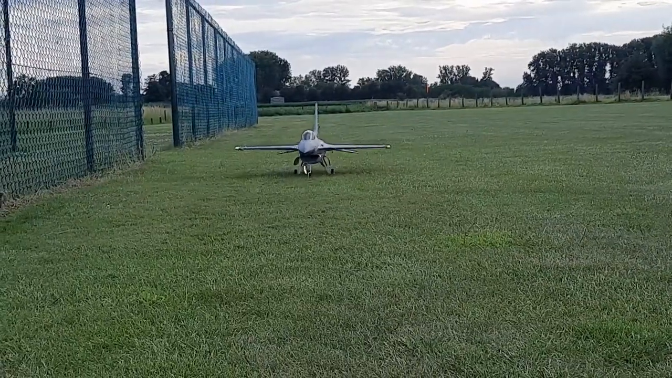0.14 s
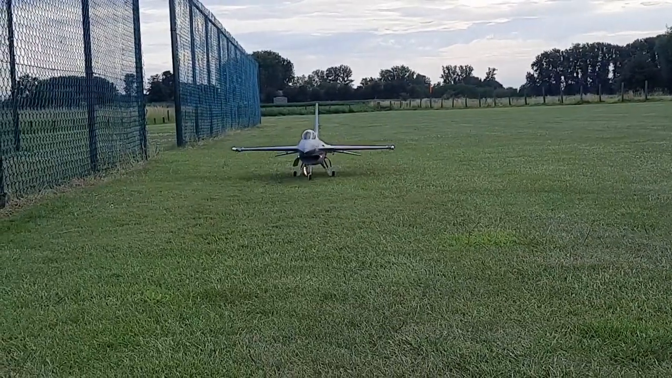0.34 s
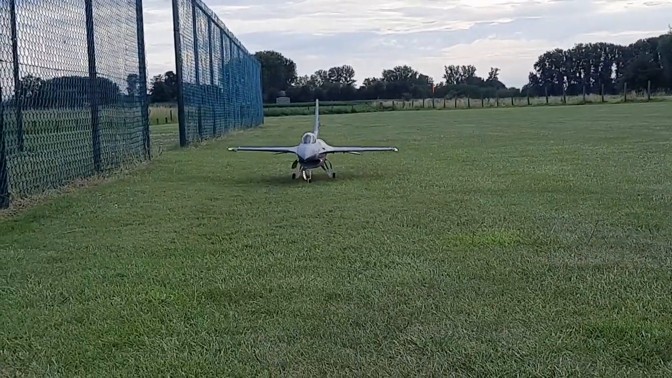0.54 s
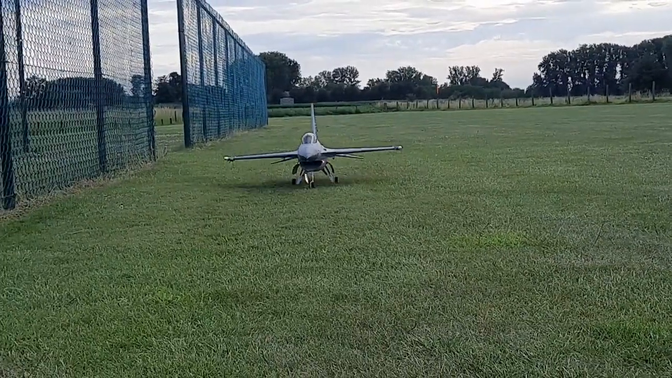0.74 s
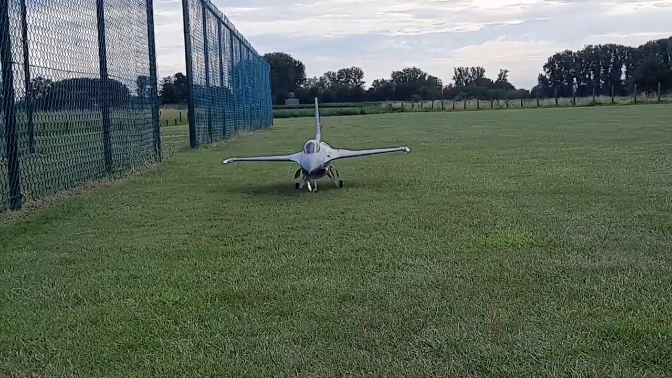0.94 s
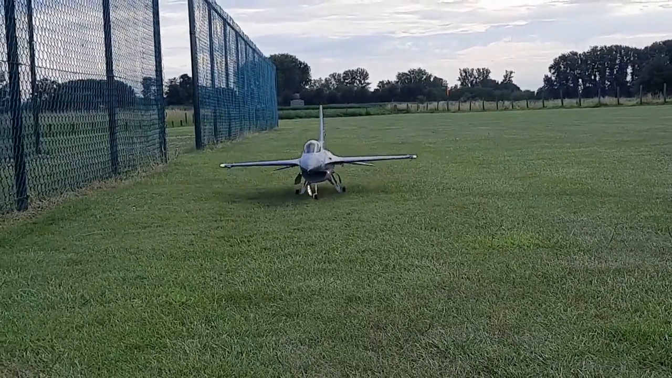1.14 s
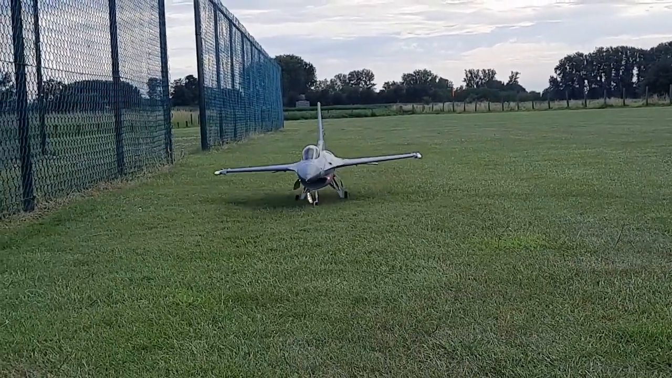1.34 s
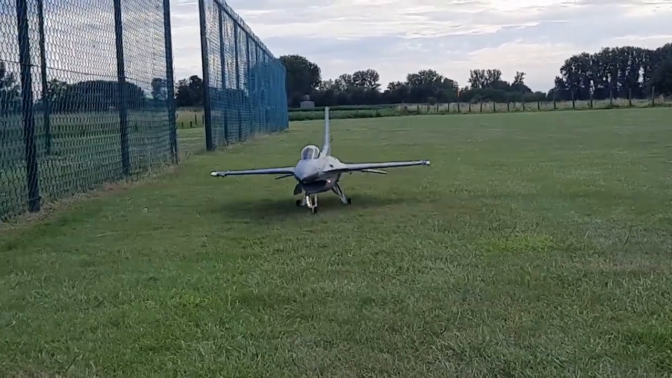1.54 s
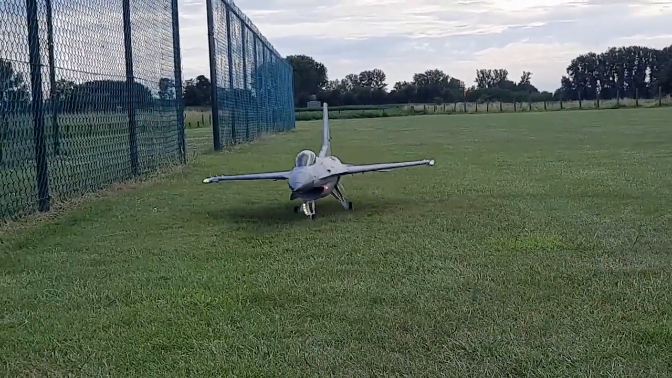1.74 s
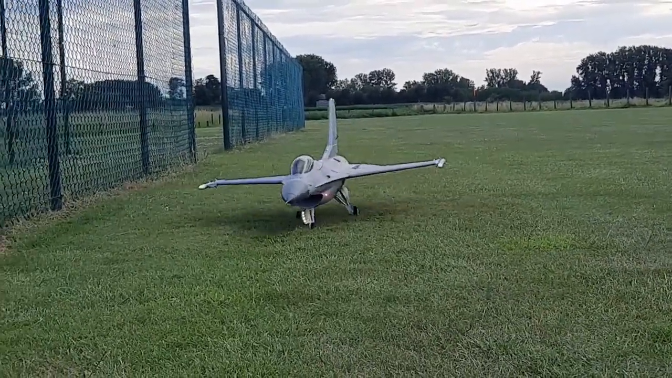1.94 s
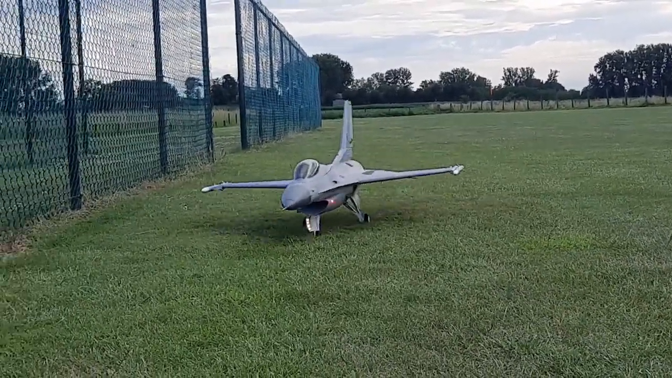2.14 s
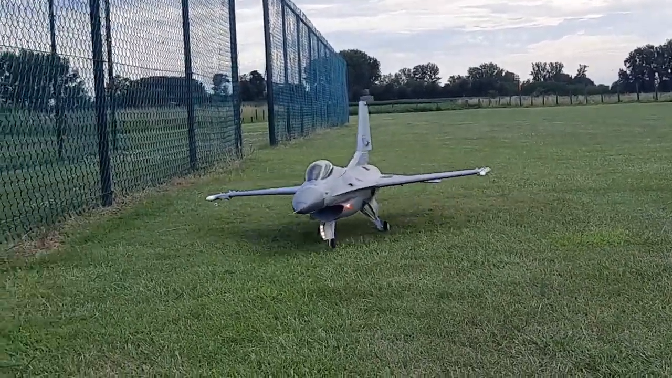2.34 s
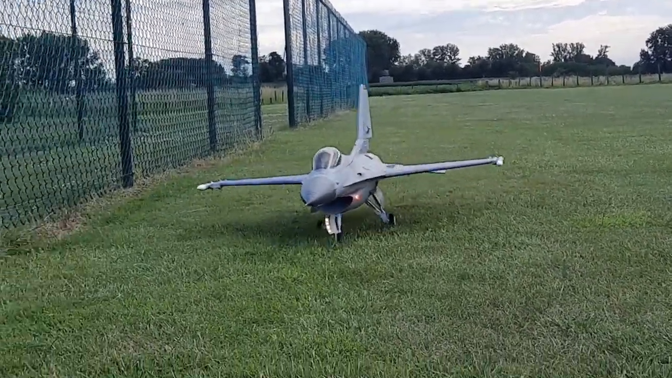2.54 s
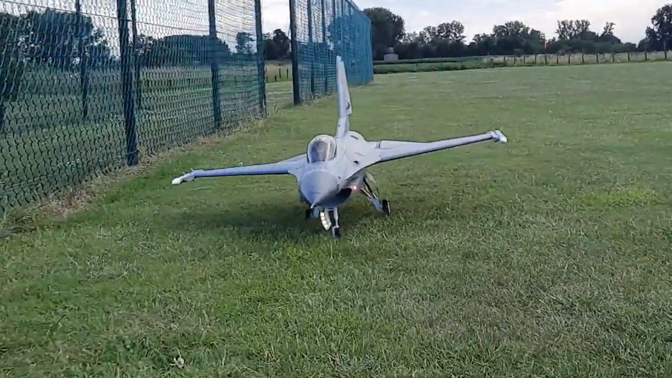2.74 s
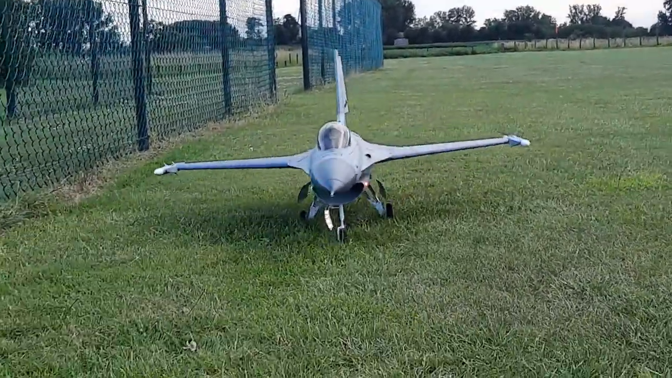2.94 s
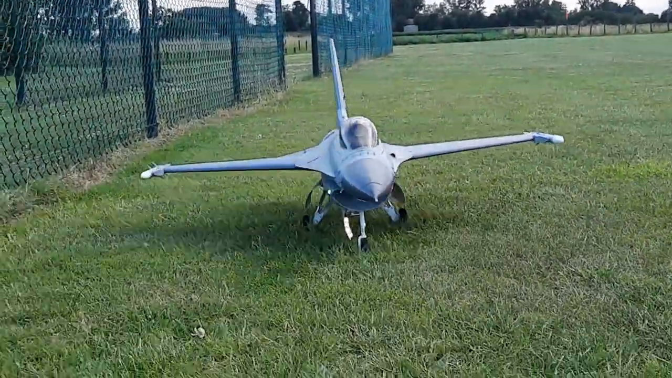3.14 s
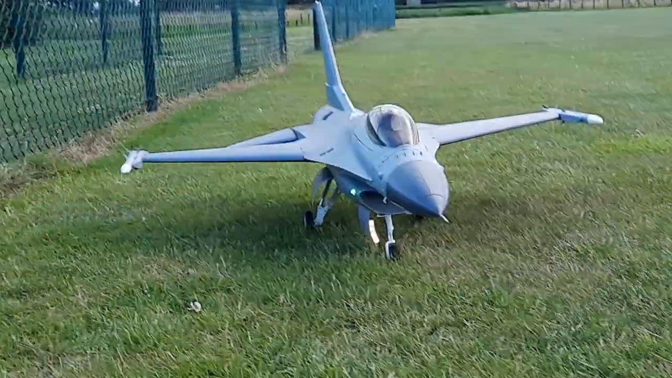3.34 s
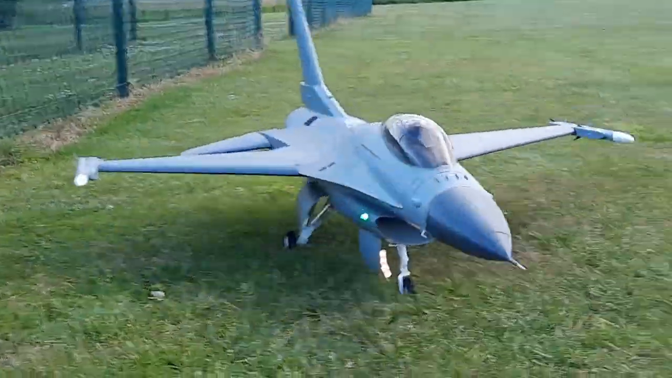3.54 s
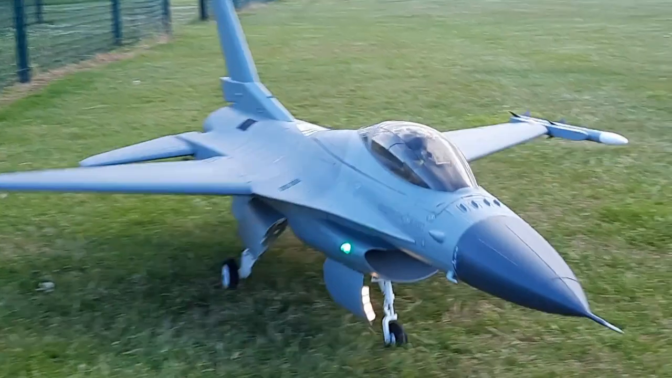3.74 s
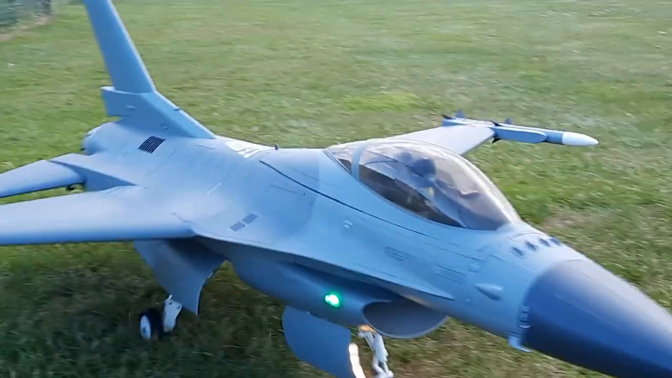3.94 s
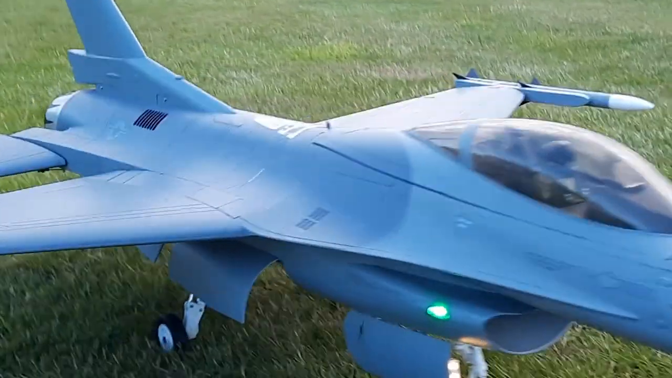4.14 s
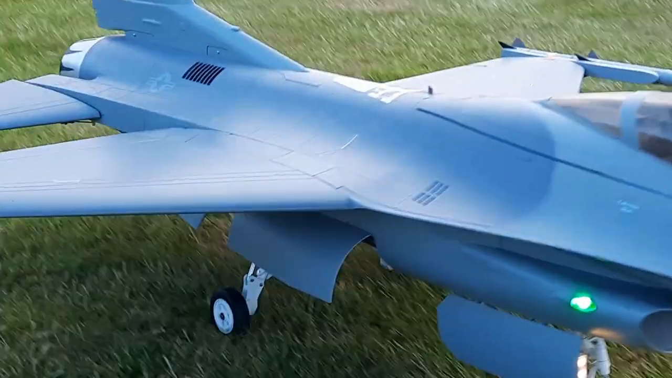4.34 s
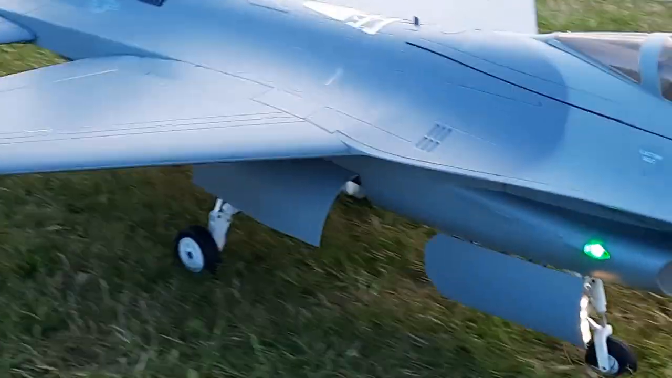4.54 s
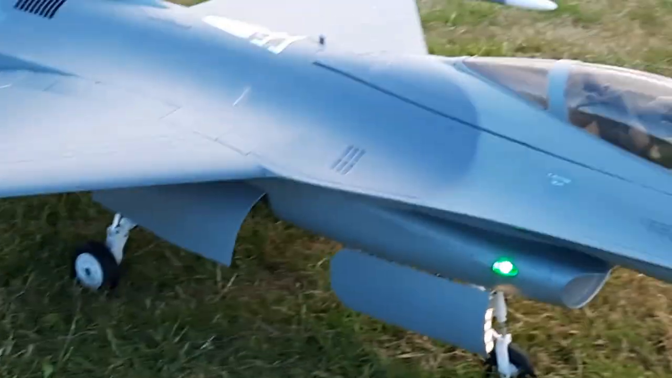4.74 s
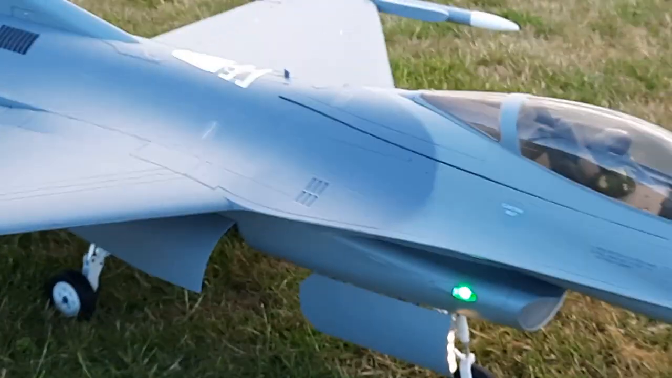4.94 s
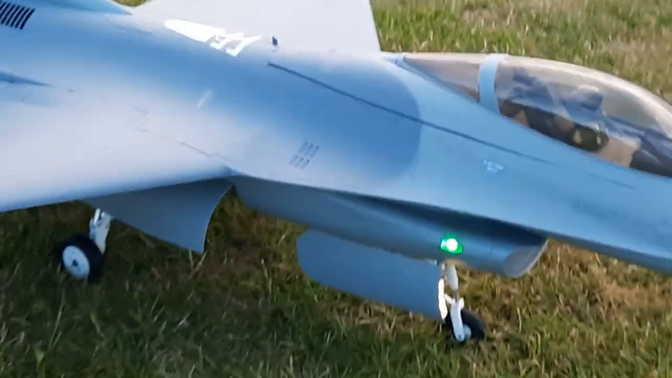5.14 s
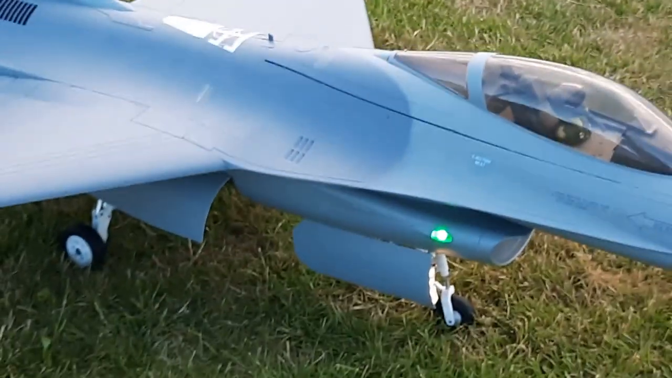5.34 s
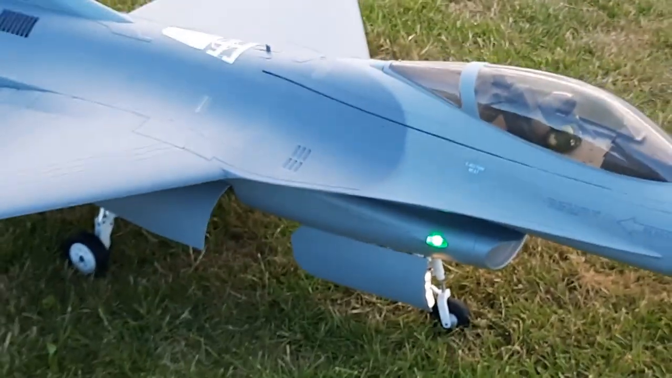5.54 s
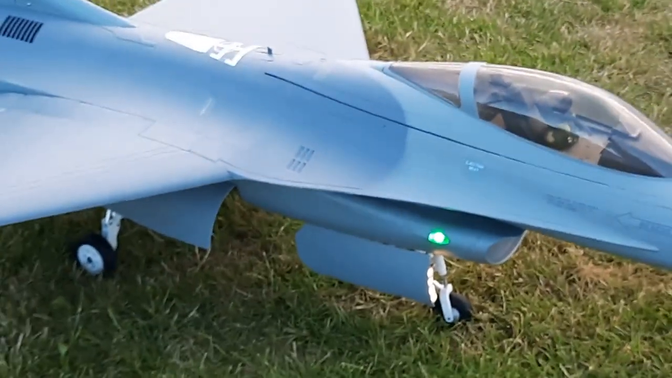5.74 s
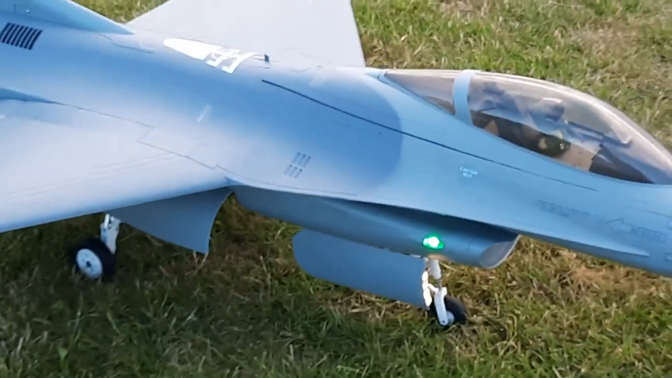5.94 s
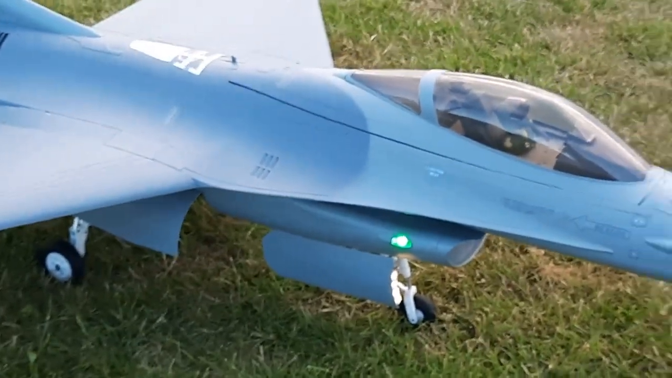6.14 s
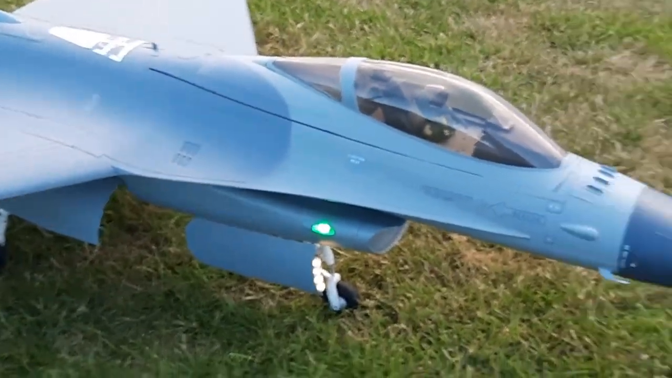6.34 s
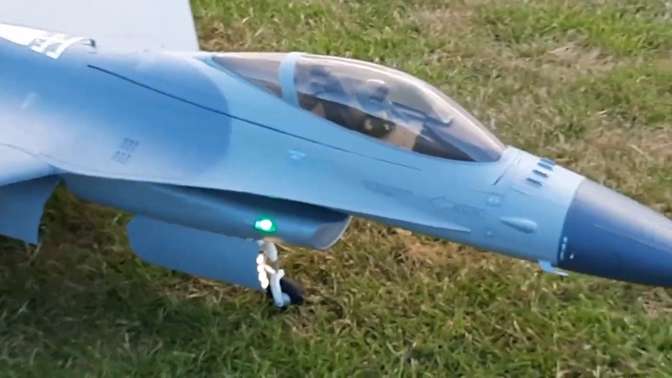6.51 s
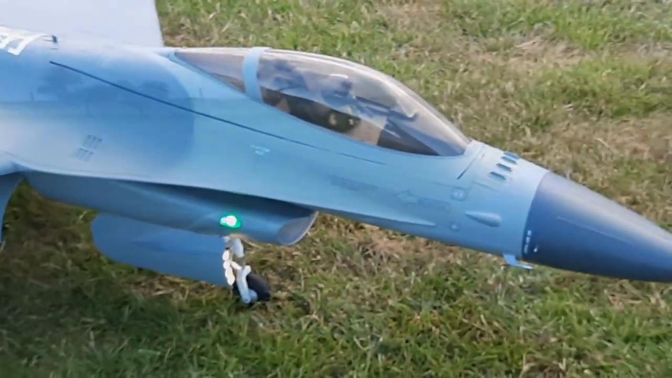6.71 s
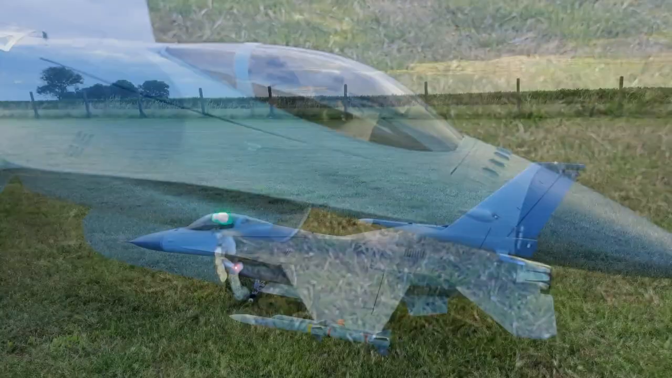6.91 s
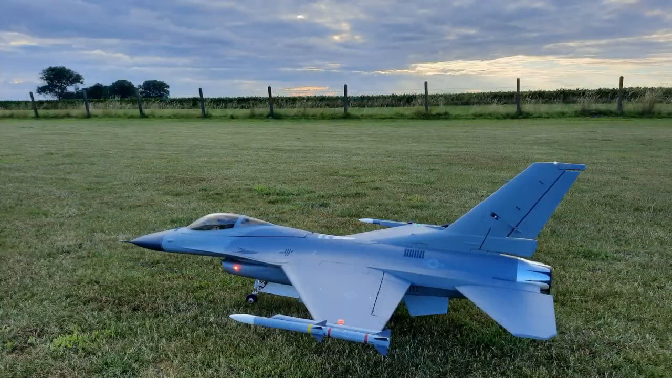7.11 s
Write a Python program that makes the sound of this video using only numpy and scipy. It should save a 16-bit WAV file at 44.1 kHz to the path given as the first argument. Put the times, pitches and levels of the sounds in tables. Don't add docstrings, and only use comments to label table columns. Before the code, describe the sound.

A piercing, slightly beating fan tone and airy duct rush grow gradually nearer over grass. After almost four seconds the pitch plunges, with uneven hollow knocks, bumps and bright rustling very close to the handheld stereo microphone. Then near silence in an open field: faint airy whirring and wavering high squeaks, a quick cluster of gritty servo buzzes, tiny dull ticks, and finally a faint faraway hiss.

```python
import sys
import numpy as np
from scipy import signal
from scipy.fft import rfft, irfft
from scipy.io import wavfile
from scipy.ndimage import uniform_filter1d, map_coordinates

SR = 44100
rng = np.random.default_rng(int(sys.argv[2]) if len(sys.argv) > 2 else 0)


def put_to_file(sound):
    columns = np.atleast_2d(sound).T
    safe = np.clip(columns, -1, 1)
    whole_steps = np.round(safe * 32767)
    wavfile.write(sys.argv[1], SR, whole_steps.astype(np.int16))


def volts_from_db(level):
    exponent = np.asarray(level, float) / 20
    return 10 ** exponent


N = 316192

HOP = 128
FRAME_S = np.arange(N // HOP + 2) * HOP / SR
BIN_HZ = np.maximum(np.arange(2 * HOP + 1) * SR / (4 * HOP), 20)[:, None]
FULL_HZ, CUT_S = 4418, 3.7

# (time [s], left port leads [ms], share of direct sound [0-1])
PATH = [(0, 0.022, 0.99), (2.5, 0.0042, 0.96), (3.2, 0.0028, 1), (3.8, 0.051, 0.99), (4.4, 0.11, 0.6),
        (5.0, 0.17, 0.71), (7.2, 0.18, 0.56)]
# (pitch [Hz], width [Hz], lift [dB])
DUCT = [(364.6, 860, -6), (474, 140, 5.5), (662, 100, 5), (990, 260, 5), (1500, 190, 8), (1843, 95, 4.5),
        (2390, 410, 3), (2920, 260, 3), (3370, 270, 3), (5600, 100, 4), (6590, 120, 4), (7600, 160, 0),
        (2104, 61, -4.5), (800, 44, -3.5), (585, 50, -3), (5860, 200, -2.5), (3800, 250, 0.5)]
# (time [s], hump [dB])
INFLOW = [(0, 3), (1.9, 4), (2.05, 7), (2.35, 8), (2.45, 4.5), (3.25, 5.5), (3.45, 11), (3.7, 14), (3.8, 8),
          (3.95, 4), (4.7, 4)]


def in_time(rows, at_s, silent_db=-120):
    s, *columns = np.transpose(rows)
    return [np.interp(at_s, s, c, silent_db, silent_db) for c in columns]


def at_hz(points, hz):
    return np.interp(np.log(hz), np.log(np.array(points)[:, 0]), np.array(points)[:, 1])


def colour_db(spectrum, modes, hz):
    bells = sum(db / (1 + (2 * (hz - top) / wide) ** 2) for top, wide, db in modes)
    return at_hz(spectrum, hz) + bells


def band_db(spectrum, modes, low_hz, high_hz):
    hz = np.arange(low_hz, high_hz)
    return 10 * np.log10(np.sum(volts_from_db(2 * colour_db(spectrum, modes, hz))) * 2 / SR)


def drift(rate, count):
    r = np.exp(-2 * np.pi * rate * HOP / SR)
    chance = rng.standard_normal((count, len(FRAME_S) + 600))
    slow = signal.lfilter([1], [1, -2 * r, r * r], chance)[:, 600:]
    return slow / slow.std(axis=1, keepdims=True)


def flicker(shared_db, own_db, rate):
    place = np.log2(BIN_HZ[:, 0] / 20) * 3
    own, below = drift(rate, count=33), place.astype(int)
    share = (place - below)[:, None]
    by_pitch = (1 - share) * own[below] + share * own[below + 1]
    return shared_db * drift(rate, count=1) + own_db * by_pitch


def swells(rows, rise, fall):
    levels = []
    for s, long_s, db in rows:
        before = np.maximum(s - FRAME_S, 0)
        after = np.maximum(FRAME_S - s - long_s, 0)
        levels.append(db - rise * before - fall * after)
    return np.max(levels, axis=0)


def grit(per_s, spread_db):
    sizes = volts_from_db(spread_db * np.minimum(rng.exponential(1, (2, N)), 4)) * rng.choice([-1, 1], (2, N))
    clicks = sizes * (rng.random((2, N)) < per_s / SR)
    return clicks / clicks.std()


def ring(clicks, hz, t60):
    r, w = volts_from_db(-60 / (t60 * SR)), 2 * np.pi * hz / SR
    return signal.lfilter([0, np.sin(w)], [1, -2 * r * np.cos(w), r * r], clicks)


def two_ports(near, other, spectrum, modes, gain_db, direct=1.0):
    # (pitch [Hz], likeness [0-1])
    likeness = [(30, 0.75), (100, 0.97), (1400, 0.99), (2500, 0.88), (3500, 0.93), (5500, 0.61), (7000, 1),
                (9000, 0.75), (10500, 0.33), (15000, .5)]
    hz = np.maximum(np.fft.rfftfreq(N, 1 / SR), 10)
    tinted = irfft(rfft([near, other]) * volts_from_db(colour_db(spectrum, modes, hz)), N)
    frames = signal.stft(tinted, nperseg=4 * HOP, noverlap=3 * HOP)[2]
    count = frames.shape[2]
    near, other = frames * volts_from_db(gain_db[:, :count])
    lead_ms, share = [c[:count] for c in in_time(PATH, FRAME_S)]
    alike = np.clip(at_hz(likeness, BIN_HZ) * direct * share ** (BIN_HZ / 2000), 0, 1)
    delayed = near * np.exp(-2j * np.pi * BIN_HZ * lead_ms / 1000)
    right = alike * delayed + np.sqrt(1 - alike ** 2) * other
    return signal.istft(np.array([near, right]), nperseg=4 * HOP, noverlap=3 * HOP)[1][:, :N]


def placed(x, lag=0.88):
    lead_ms = in_time(PATH, np.arange(N) / SR)[0]
    heard_at = np.arange(N) - lag * lead_ms * SR / 1000
    return np.array([x, map_coordinates(x, [heard_at], order=3)])


def speed_at(t):
    # (time [s], blade rate [Hz])
    speed = [(0.0, 4262), (0.1, 4151), (2.36, 4163), (2.5, 4312), (2.73, 4405), (2.8, 4477), (3.68, 4465),
             (3.75, 4365), (3.87, 3825), (3.94, 3346), (4.06, 2238), (4.19, 1574), (4.3, 1204), (4.54, 737),
             (4.76, 482), (4.98, 296), (5.1, 207), (5.28, 108)]
    s, rate = np.transpose(speed)
    hz = np.exp(np.interp(t, s, np.log(rate)))
    return hz, 20 * np.log10(hz / FULL_HZ)


def near_at(t):
    # (time [s], gain [dB])
    nearness = [(0.0, -9), (0.03, -9), (1.0, -6.5), (1.96, -4.5), (2.15, -3.5), (2.46, -3.5), (3.0, -2.5),
                (3.5, -1.5), (3.7, -1.3), (3.86, 0.5), (4.2, 5), (4.7, 2)]
    return np.interp(t, *np.transpose(nearness))


def shaft_hum():
    t = np.arange(N) / SR
    rate_hz, slow_db = speed_at(t)
    turn = 2 * np.pi * np.cumsum(rate_hz / 12) / SR
    sway_db = 2.5 * np.interp(t, FRAME_S, drift(3.0, count=1)[0])
    level_db = -37.5 + 0.82 * near_at(t) + 40 * slow_db * (t > CUT_S) + sway_db
    return placed(volts_from_db(level_db) * np.sin(turn))


def blade_tones():
    # (level [dB], share of nearness, share of the beat)
    driven_tones = [
        (-33, 1.1, 1.0),
        (-47, .6, .8),
        (-56, .4, .55),
    ]
    # (level [dB], power of speed, share of own rings, share of blade rate's path)
    coasting_tones = [
        (-34, 1.1, 1.0, 0.0),
        (-98.5, -1.0, 1.4, .5),
        (-49, 1.3, 1.8, .4),
    ]
    # (pitch [Hz], level [dB])
    shell = [(100, -3), (200, -2), (260, 13.5), (450, 16.5), (850, -0.5), (1300, -3), (2200, -2),
             (3400, 8.5), (4100, 9.5), (4400, 4.5)]
    # (pitch [Hz], width [Hz], lift [dB])
    shell_rings = [(290, 50, 15), (470, 60, -3.5), (553, 88, 11), (830, 55, 10.5), (1004, 140, 9.5),
                   (1480, 120, 6), (2800, 180, 3), (4407, 59, 6), (13440, 500, 9.5)]
    # (pitch [Hz], width [Hz], lift [dB])
    shell_dips = [(250, 24, -7), (370, 33, -15), (538, 14, -20), (770, 64, -6), (927, 60, -22),
                  (1000, 80, -18), (1170, 72, 3), (1290, 80, -12), (1850, 300, -8), (2350, 150, -8),
                  (3450, 120, -6)]
    # (pitch [Hz], width [Hz], lift [dB])
    octave_rings = [(1650, 73, 35), (5700, 900, 42.5)]
    flat = [(20, 0), (SR, 0)]
    fade_s = 0.029

    t = np.arange(N) / SR
    rate_hz, slow_db = speed_at(FRAME_S)
    wobble = drift(11.0, count=4)
    unsteady = np.where(t < CUT_S, .00015, .006) * np.interp(t, FRAME_S, wobble[3])
    turn = 2 * np.pi * np.cumsum(speed_at(t)[0] * (1 + unsteady)) / SR
    steady = np.clip(rate_hz / 4000, .25, 1)
    driven = np.clip((CUT_S + fade_s - FRAME_S) / fade_s, 0, 1)

    echo = np.clip(.24 + .13 * FRAME_S, .1, .9) * np.clip((2.3 - FRAME_S) / 0.25, .25, 1)
    echo = echo * np.exp(2j * np.pi * (FRAME_S - 0.78) / 0.3367)
    beat_db = 20 * np.log10(np.abs(1 + echo))
    smear_db = 2.0 * np.maximum(in_time(INFLOW, FRAME_S)[0] - 5.0, 0)
    gusts = np.clip(drift(40.0, count=1)[0], -2, .8) - .5
    flutter_db = 5.0 * np.clip(rate_hz / 1500 - .45, 0, 1) * gusts
    path_db = colour_db(shell, shell_rings + shell_dips, rate_hz)
    stop_db = -400 * np.maximum(FRAME_S - 5.215, 0)

    out = 0
    for k in range(3):
        on_db, near, beat = driven_tones[k]
        off_db, power, own, share = coasting_tones[k]
        ring_db = colour_db(flat, shell_rings, (k + 1) * rate_hz)
        smear = .3 if k == 1 else 1
        on = on_db + near * near_at(FRAME_S) + beat * beat_db - smear_db * smear + ring_db
        off = off_db + power * slow_db
        if k == 0:
            off = off + path_db
        else:
            off = off + own * ring_db * (rate_hz < 2000) + share * path_db
        if k == 1:
            off = off + colour_db(flat, octave_rings, 2 * rate_hz)
        if k == 2:
            off = off - 9.0 * (rate_hz > 2000)
        db = driven * on + (1 - driven) * (off + flutter_db)
        db = db + 1.1 * steady * (1 + k) * wobble[k] + stop_db
        out = out + np.interp(t, FRAME_S, volts_from_db(db + 4.0)) * np.sin((k + 1) * turn)
    return placed(out)


def fan_air():
    # (pitch [Hz], level [dB per Hz])
    fan = [(41, -42.5), (70, -19.5), (228, -12.5), (342, -0.5), (590, -11.5), (1040, -9), (1300, -21.5),
           (1530, -17), (1750, -20), (4050, -11), (5830, -14), (8000, -12.5), (9170, -24.5), (12900, -22),
           (15800, -33)]
    airflow_hz = [500, 1800, 5500, 12000]
    # (level close by [dB], share of nearness, gain when turned [dB], power of speed)
    air_laws = [
        (-27, 1.06, 0.6, 1.9),
        (-37.5, 1.654, 4, 4.86),
        (-24, 1.13, -2, 3),
        (-44, 0.42, 7.5, 3),
    ]
    # (time [s], share turned [0-1])
    turned_path = [(0.0, 0.43), (1.0, 0.36), (2.5, 0.51), (3.05, 0.78), (3.6, .95), (4.3, 0.63)]
    # (start [s], length [s], pitch [Hz], width [Hz], lift [dB])
    band_lifts = [(2.25, .27, 5520, 150, 7), (2.3, .55, 6350, 450, 4), (4.05, 0.2, 1500, 200, 8),
                  (3.7, .27, 2680, 250, 9), (3.68, 0.14, 2400, 1000, -5.5), (3.92, .1, 6300, 460, 8),
                  (3.96, 0.11, 4700, 350, 10), (4.4, 0.12, 5700, 400, 4), (4.8, 0.15, 5500, 200, 8),
                  (2.6, .9, 7900, 1600, -4), (3.7, .3, 13400, 2000, 6), (2.75, 1.5, 70, 160, 5),
                  (3.95, .15, 5600, 300, 6), (3.6, .35, 520, 200, 3), (2.62, .2, 3300, 1400, -3),
                  (4.0, .3, 13000, 4000, 3), (3.35, .35, 5000, 400, 3)]
    edges = [(60, 1200), (1300, 2400), (4800, 8200), (9500, 15500)]
    rate_hz, slow_db = speed_at(FRAME_S)
    turned = np.interp(FRAME_S, *np.transpose(turned_path))

    gain_db = 0
    for (db, near, turn_db, power), band, one in zip(air_laws, edges, np.eye(4)):
        level_db = db + near * near_at(FRAME_S) + turn_db * turned + power * slow_db
        weight = np.interp(np.log(BIN_HZ), np.log(airflow_hz), one)
        gain_db = gain_db + weight * (level_db - band_db(fan, DUCT, *band))

    hump_db = np.maximum(in_time(INFLOW, FRAME_S)[0], 0)
    third_share = .45 * np.minimum(rate_hz / FULL_HZ, 1) ** 24
    for order, share, wide in [(1, 0.58, 0.036), (3, third_share, 0.02)]:
        away = np.log(BIN_HZ / (order * 1.016 * rate_hz)) / (wide * (1 + 1.6 * turned))
        gain_db = gain_db + share * hump_db * np.exp(-away ** 2)

    for s, long_s, hz, wide, db in band_lifts:
        present = np.clip(np.minimum(FRAME_S - s, s + long_s - FRAME_S) / .04, 0, 1)
        gain_db = gain_db + db * present / (1 + (2 * (BIN_HZ - hz) / wide) ** 2)

    bumpy = 1 + 1.1 / (1 + (BIN_HZ / 1200) ** 2)
    gain_db = gain_db + bumpy * flicker(0.24, 0.34, 21.0) + flicker(0.2, 0.39, 0.41)
    return two_ports(*rng.standard_normal((2, N)), fan, DUCT, gain_db)


def quiet_field():
    # (pitch [Hz], level [dB per Hz])
    field = [(18, -30), (30, -12), (134, -5.5), (209, -16.5), (318, -10), (483, -16.5), (716, -21),
             (1380, -27.5), (2100, -16.5), (2520, -20.5), (3360, -37), (5830, -29.5), (9350, -41.5),
             (13500, -34), (15800, -40)]
    # (time [s], half length [s], pitch [Hz], lift [dB])
    stirs = [
        (5.953, 0.05, 450, 11.5),
        (6.593, 0.035, 521, 10.5),
    ]
    gain_db = -70.5 - band_db(field, [], 30, 15800) + flicker(.5, 1.0, 1.9)
    for s, wide_s, hz, db in stirs:
        gain_db = gain_db + db * np.exp(-((FRAME_S - s) / wide_s) ** 2 - np.log2(BIN_HZ / hz) ** 2)
    return two_ports(*rng.standard_normal((2, N)), field, [], gain_db, direct=0.23)


def rolling():
    # (pitch [Hz], level [dB per Hz])
    airframe = [(20, -51), (50, -26.5), (140, -9), (240, -11.5), (420, -11), (1000, -22.5), (1700, -24.5),
                (2050, -25), (2750, -18), (3600, -26), (6100, -26.5), (6700, -29), (9000, -38),
                (15800, -44.5)]
    # (time [s], level [dB])
    bumps = [(4.022, -43), (4.12, -52), (4.27, -45.5), (4.426, -49), (4.594, -46.5), (4.734, -50),
             (4.87, -54.5), (5.03, -53)]
    # (start [s], length [s], level [dB])
    drags = [(4.0, 0.1, -39.5), (4.1, 0.16, -43.5), (4.3, 0.051, -49), (4.384, 0.063, -49),
             (4.46, .08, -48.5), (4.55, 0.084, -49.5), (4.685, .095, -49.5), (4.805, 0.034, -48),
             (4.86, 0.044, -54.5), (4.922, 0.018, -48.5), (4.97, 0.038, -54), (5.05, 0.19, -66)]
    rumble_db = swells([(s, 0, db) for s, db in bumps], 130, 140)
    rustle_db = swells(drags, 500, 380)
    bright = np.interp(np.log(BIN_HZ), np.log([300, 1500]), [0, 1])
    low_db = rumble_db - band_db(airframe, [], 60, 160)
    high_db = rustle_db - band_db(airframe, [], 2200, 8000)
    gain_db = (1 - bright) * low_db + bright * high_db - 1.5 + flicker(1.9, 1.5, 33.0)
    return two_ports(*grit(10000.0, 1.0), airframe, DUCT[:9], gain_db)


def knocks():
    # (time [s], peak [dB], ring [Hz], thud [dB])
    hits = [(4.1119, -30, 1730, -3), (4.2279, -33, 2450, 5), (4.234, -36, 1500, 10),
            (4.2663, -36, 1450, -12), (4.309, -39.5, 1190, -14), (4.3876, -31, 1800, -12),
            (4.3933, -39.5, 1020, 5), (4.4163, -37, 1150, -2), (4.4258, -39, 2800, 6),
            (4.476, -37, 1670, -1), (4.518, -31, 1400, -10), (4.528, -35, 1680, -12),
            (4.551, -44, 1500, -10), (4.5845, -32, 2330, -9), (4.5908, -32, 1100, -5),
            (4.6109, -37, 1900, -3), (4.687, -46, 3020, -12), (4.7216, -38, 1740, -3),
            (4.806, -45, 2670, -15), (4.833, -35, 1760, -8), (4.9223, -39, 1000, -13)]
    out, size = np.zeros(N), 2000
    crack_filter = signal.butter(2, [900, 5600], "band", fs=SR)
    for s, db, hz, thud_db in hits:
        luck = rng.standard_normal(size)
        burst = luck * np.exp(-np.arange(size) / (0.0018 * SR))
        burst *= 8.6 / np.linalg.norm(burst)
        crack = signal.lfilter(*crack_filter, burst)
        shell = 0
        for ratio, lift_db in [(1, -17), (1.55, -22), (2.4, -32)]:
            shell = shell + volts_from_db(lift_db) * ring(burst, hz * ratio, 0.011)
        late_click = np.eye(1, size, 60)[0]
        thud = ring(late_click, 430 * volts_from_db(luck[0]), 0.045)
        out[round(s * SR):][:size] += volts_from_db(db) * (1.5 * crack + shell + volts_from_db(thud_db) * thud)
    no_bass = signal.butter(2, 250, "high", fs=SR, output="sos")
    return placed(signal.sosfilt(no_bass, out), lag=.35)


def whir():
    # (time [s], level [dB])
    fade = [(4.95, -75), (5.122, -65), (5.442, -64.5), (5.588, -67), (5.806, -65), (5.962, -69),
            (6.17, -81.5)]
    # (pitch [Hz], level [dB per Hz])
    whir_air = [(350, -76), (600, -33), (868, -14), (1440, -24.5), (1520, -16), (2140, 1), (2390, -1),
                (2930, -19.5), (3970, -18), (5820, -23), (6950, -22), (11400, -28), (15800, -30)]
    # (pitch [Hz], width [Hz], lift [dB])
    modes = [(2860, 200, -14.5), (3870, 400, 8.5), (5730, 480, 11.0), (7530, 300, 10), (11500, 1500, 4.5)]
    treble_db = 6.0 * np.clip(5.5 - FRAME_S, 0, 1) * np.log2(np.maximum(BIN_HZ / 5000, 1))
    gain_db = in_time(fade, FRAME_S)[0] + treble_db + 1.3 - band_db(whir_air, [], 1800, 2800)
    gain_db = gain_db + flicker(.8, 1.5, 12.0)
    return two_ports(*rng.standard_normal((2, N)), whir_air, modes, gain_db, direct=0.29)


def squeals():
    # (time [s], pitch [Hz])
    squeal = [(5.0, 10500), (5.12, 10400), (5.2, 9700), (5.27, 10200), (5.38, 9700), (5.45, 10300),
              (5.575, 8850), (5.63, 10400), (5.715, 9150), (5.77, 9550), (5.85, 9200), (5.885, 8600),
              (5.92, 8550), (5.94, 8200), (5.99, 7950), (6.04, 7100), (6.09, 6000)]
    # (pitch ratio, first level [dB], last level [dB])
    squeal_lines = [(.9, -96, -90), (1.0, -84, -80), (1.07, -80, -99), (1.13, -77, -95), (1.17, -80, -99),
                    (1.22, -80, -97), (1.3, -83, -94), (1.42, -89, -88), (1.57, -92, -86)]
    # (time [s], half length [s], top pitch [Hz], level [dB])
    catches = [(5.632, .026, 11750, -64), (5.976, .016, 9800, -75), (5.38, .04, 10600, -77),
               (5.23, .05, 11500, -75), (5.04, .04, 11300, -76)]
    first = round(4.9 * SR)
    t = np.arange(first, round(6.2 * SR)) / SR
    s, hz = np.transpose(squeal)
    pitch_hz = uniform_filter1d(np.interp(t, s, hz), size=900)
    along = (t - s[0]) / (s[-1] - s[0])
    ends_db = -300 * np.maximum(np.abs(along - .5) - .46, 0)
    out, chance = np.zeros(N), drift(22.0, count=2 * len(squeal_lines))
    for (ratio, first_db, last_db), sway, waver in zip(squeal_lines, chance[::2], chance[1::2]):
        depth = (.022 - .014 * along) * (.3 if ratio == 1 else 1)
        line_hz = pitch_hz * ratio * (1 + depth * np.interp(t, FRAME_S, sway))
        db = first_db + (last_db - first_db) * along + ends_db
        db = db + 4.6 * np.interp(t, FRAME_S, np.minimum(waver, .9))
        out[first:][:len(t)] += volts_from_db(db) * np.sin(2 * np.pi * np.cumsum(line_hz) / SR)
    for s, half_s, top_hz, db in catches:
        arch = np.abs(np.clip((t - s) / half_s, -1, 1)) ** 3
        turn = 2 * np.pi * np.cumsum(top_hz * (1 - .11 * arch)) / SR
        out[first:][:len(t)] += volts_from_db(db - 7.7 * arch) * (arch < 1) * np.sin(turn)
    return out


def servo():
    # (start [s], length [s], gear level [dB], singing pitch [Hz], singing lift [dB])
    strokes = [(6.169, .03, -51, 3200, 4), (6.197, 0.0093, -49, 2700, 13), (6.208, 0.046, -56.5, 2610, 5),
               (6.256, 0.023, -45, 2750, 1), (6.279, 0.016, -39, 1930, 7.5), (6.294, .016, -39, 780, 16),
               (6.312, .012, -43.5, 5500, 4), (6.327, 0.034, -51.5, 840, 8), (6.366, 0.027, -51, 2800, 8),
               (6.392, 0.016, -46, 3050, 11), (6.41, 0.018, -46, 3000, 12), (6.431, .022, -49, 2500, 7),
               (6.477, 0.016, -47.5, 2700, 8), (6.499, 0.014, -42, 3140, 12), (6.512, .01, -46.5, 3500, 8),
               (6.523, 0.014, -41.5, 3270, 20), (6.54, 0.0095, -47, 3030, 7)]
    # (pitch [Hz], level [dB per Hz])
    gears = [(150, -54.5), (250, -39), (297, -17), (575, -35), (813, -11.5), (1630, -11), (1870, -11.5),
             (3090, -5), (6000, -12.5), (8900, -22.5), (10000, -18), (11200, -17), (15800, -28)]
    # (pitch [Hz], width [Hz], lift [dB])
    servo_case = [(810, 58, 3.5), (1010, 87, 6), (1910, 59, 12.5), (2700, 120, 4), (3314, 190, -6.5),
                  (4050, 170, 5), (10700, 190, 7)]
    t, effort = np.arange(N) / SR, np.zeros(N)
    gain_db = flicker(.6, 2.6, 49.0)
    sing_db = 0 * gain_db
    for s, long_s, db, hz, lift_db in strokes:
        shape = np.clip((t - s) / 0.007, 0, 1) * np.exp(-np.maximum(t - s - long_s, 0) / 0.0057)
        echo = volts_from_db(-16.5) * (t > s) * np.exp(-np.abs(t - s - long_s) / 0.04)
        effort = np.maximum(effort, volts_from_db(db) * (shape + echo))
        sing_db[:, FRAME_S >= s - .004] = lift_db / (1 + (2 * (BIN_HZ - hz) / (150 + .12 * hz)) ** 2)
    gain_db = gain_db + sing_db + 0.5 - band_db(gears, servo_case, 700, 5000)
    return effort * two_ports(*grit(9000.0, 2.1), gears, servo_case, gain_db, direct=0.97)


def ticks():
    # (time [s], peak [dB], pitch [Hz])
    settling = [
        (6.864, -64.5, 680),
        (6.898, -64, 692),
        (6.929, -57.5, 742),
        (6.956, -69, 620),
    ]
    out = np.zeros(N)
    for s, db, hz in settling:
        out[round(s * SR):][:800] += volts_from_db(db) * ring(np.eye(1, 800)[0], hz, .02)
    return out


def last_hiss():
    # (pitch [Hz], level [dB per Hz])
    last_air = [(120, -50.5), (200, -20), (732, -9), (1120, -20), (1240, -16), (2940, -17), (3530, -21),
                (4240, -17), (4990, -23), (15800, -30)]
    # (time [s], level [dB])
    last_fade = [(7.02, -102), (7.08, -88), (7.13, -70), (7.17, -67.5)]
    held = last_fade + [(7.2, last_fade[-1][1])]
    gain_db = in_time(held, FRAME_S)[0] + 2.5 - band_db(last_air, [], 300, 15500)
    gain_db = gain_db + 6.0 * np.exp(-((BIN_HZ - 13000) / 2000) ** 2)
    return two_ports(*rng.standard_normal((2, N)), last_air, [], gain_db, direct=.5)


def scene():
    # (time [s], left over right [dB])
    balance = [(0, 1.9), (1.2, 1.2), (2.2, 1), (2.8, 0.4), (3.7, .7), (4.2, 0.6), (4.8, 1.2), (5.501, 0.7),
               (6.2, -0.2), (6.7, -0.5), (7.17, -2.5)]
    side_db = np.interp(np.arange(N) / SR, *np.transpose(balance)) / 2
    plane = shaft_hum() + blade_tones() + fan_air() + rolling() + knocks()
    plane = plane + whir() + squeals() + servo() + ticks()
    return volts_from_db([side_db, -side_db]) * (plane + quiet_field() + last_hiss())


def low_pass(x):
    return signal.sosfilt(signal.butter(12, 16330, fs=SR, output="sos"), x)


def record(dry):
    # (pitch [Hz], left over right [dB])
    ports = [(40, 2.5), (99, 1), (160, 2.5), (270, 1.5), (450, 3.5), (740, 3.5), (1220, 4), (2010, -1.5),
             (3330, 0), (5500, -2.5), (9080, 0.5), (15000, 29.5)]
    # (pitch [Hz], left leads [rad])
    port_phase = [(1800, -0.11), (2580, -0.66), (3620, 1.02), (4220, 0.21), (5860, 0.36), (6200, 0.51),
                  (8350, -0.057), (10100, 0.84), (11400, 0.83)]
    hz = np.maximum(np.fft.rfftfreq(N, 1 / SR), 10)
    tilt_db, passed = at_hz(ports, hz) / 2, hz < 15750
    mean = (volts_from_db(tilt_db) + volts_from_db(-tilt_db)) / 2
    turn = np.exp(.5j * at_hz(port_phase, hz) * np.array([[1], [-1]]))
    mix = irfft(rfft(dry) * volts_from_db([tilt_db, -tilt_db]) * turn / mean * passed, N)
    return low_pass(mix)


dry = scene()
out = record(dry)
put_to_file(out)
```